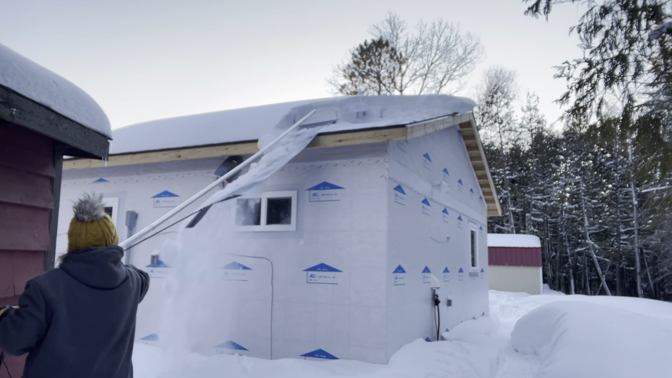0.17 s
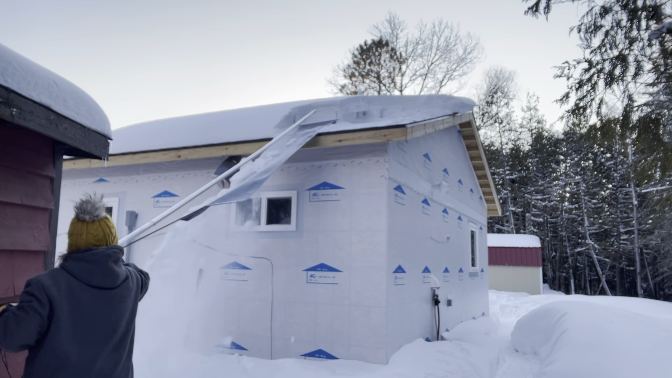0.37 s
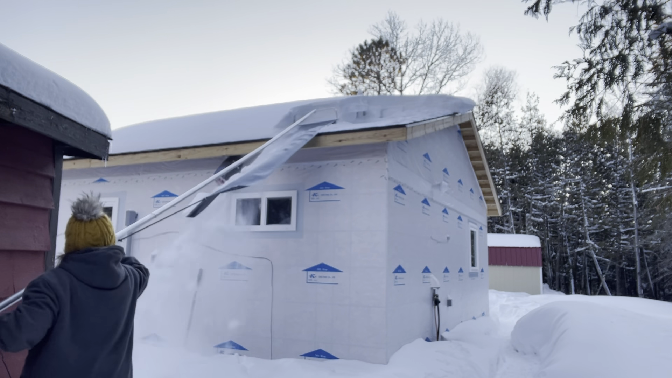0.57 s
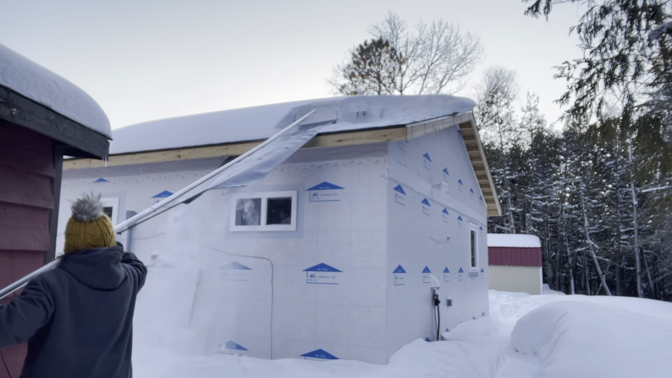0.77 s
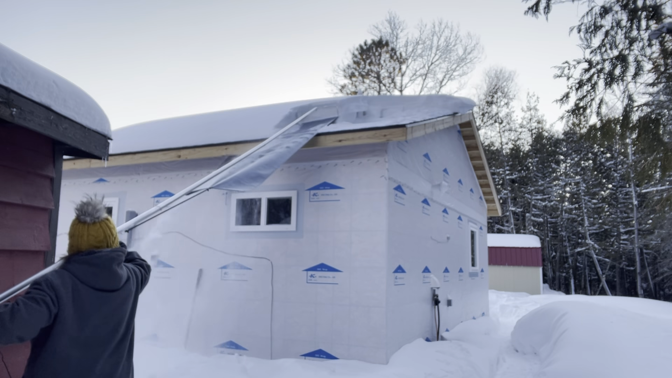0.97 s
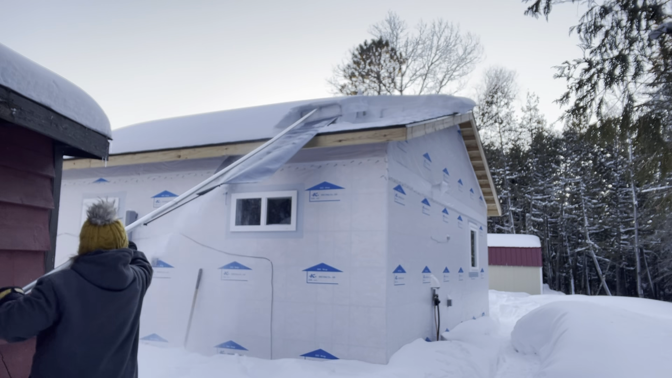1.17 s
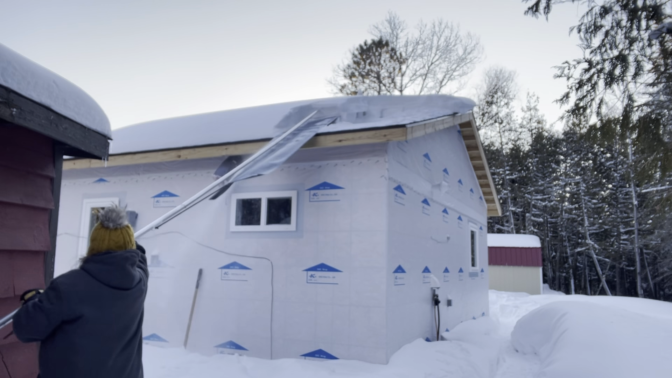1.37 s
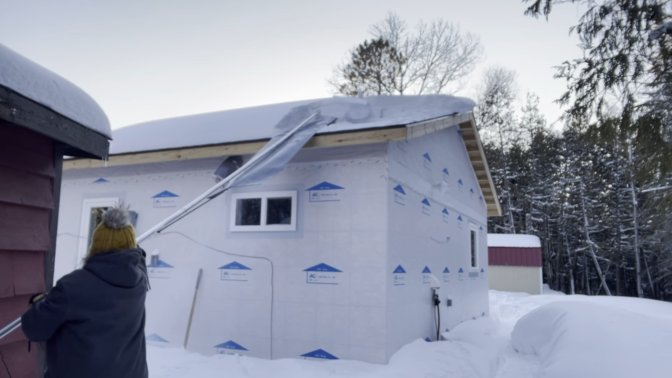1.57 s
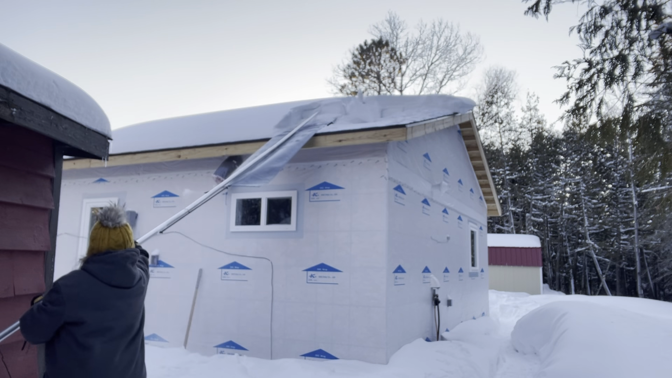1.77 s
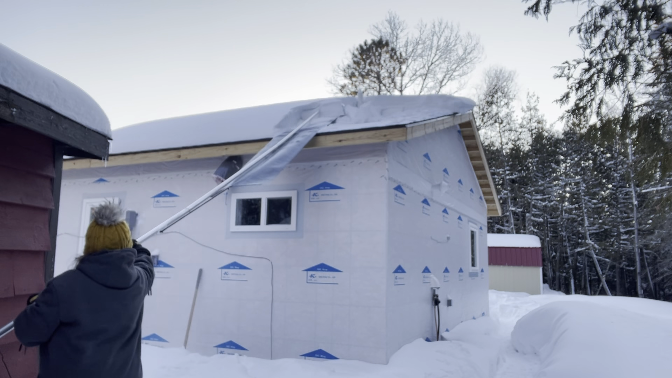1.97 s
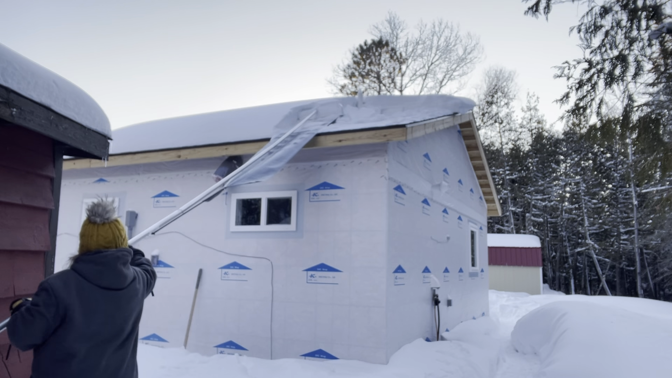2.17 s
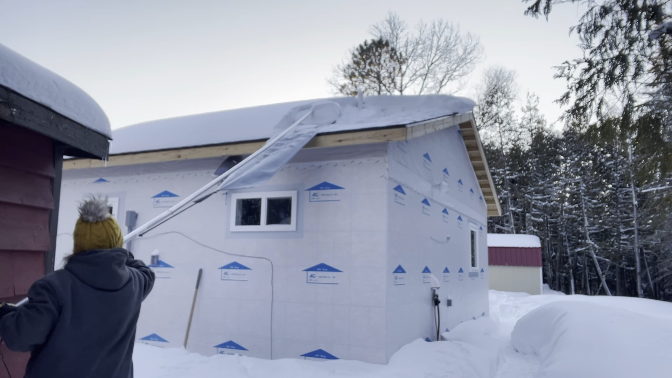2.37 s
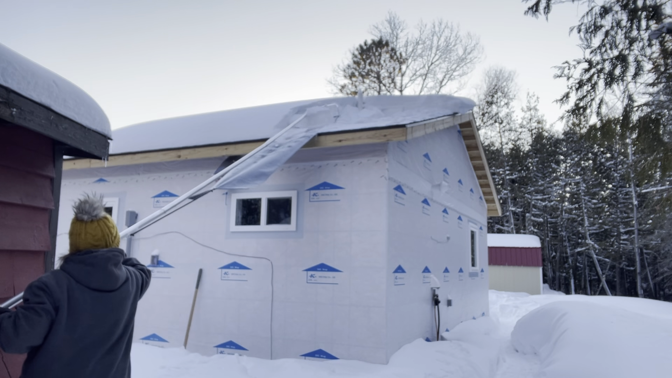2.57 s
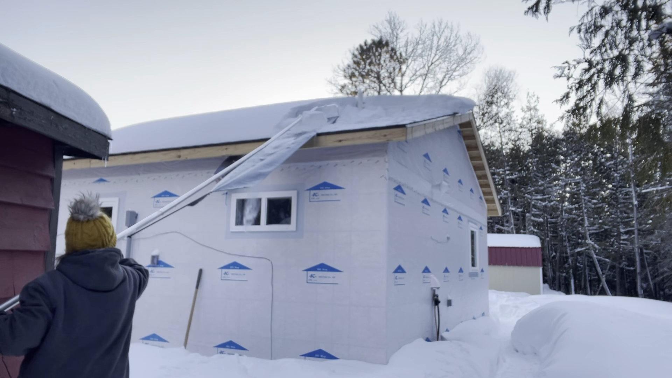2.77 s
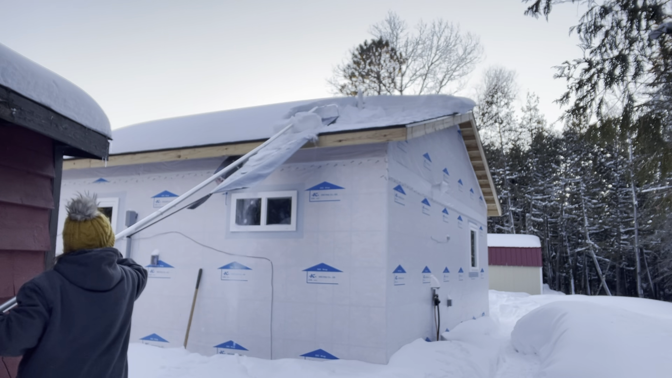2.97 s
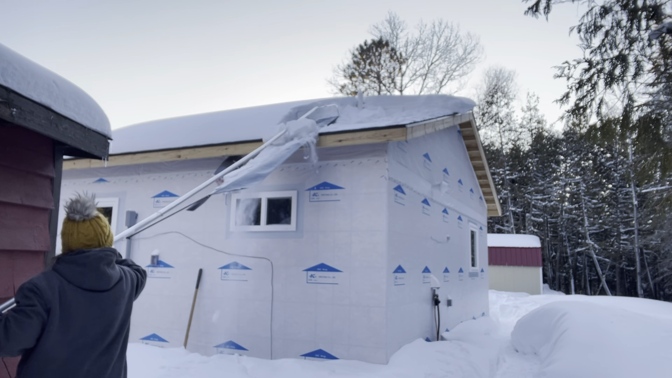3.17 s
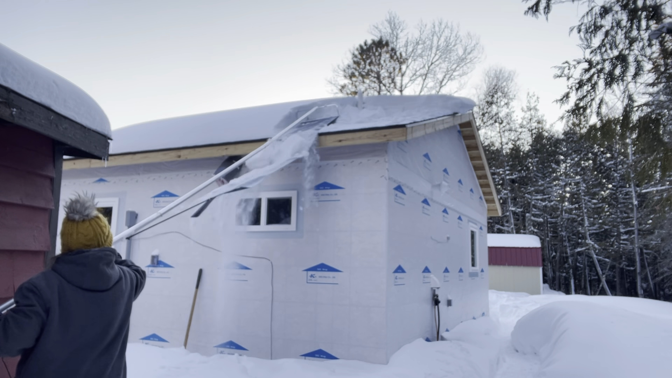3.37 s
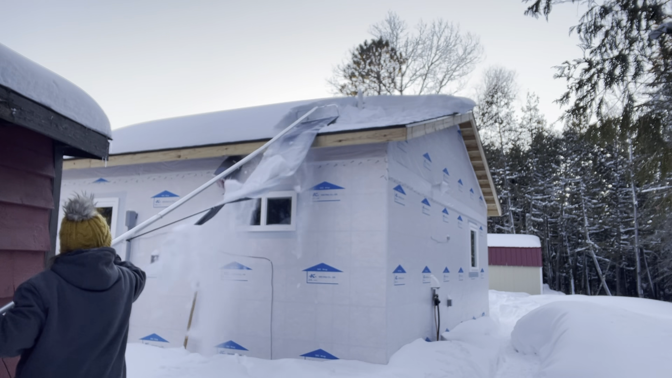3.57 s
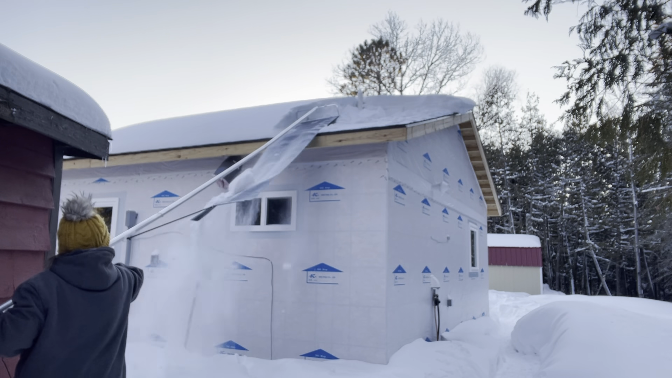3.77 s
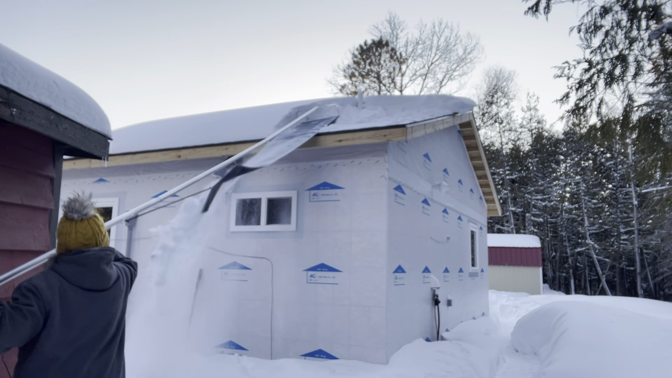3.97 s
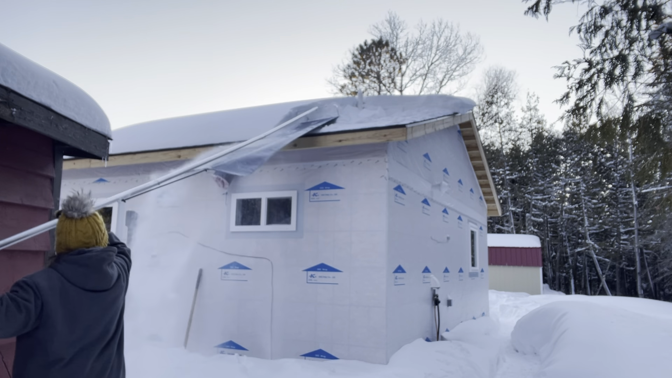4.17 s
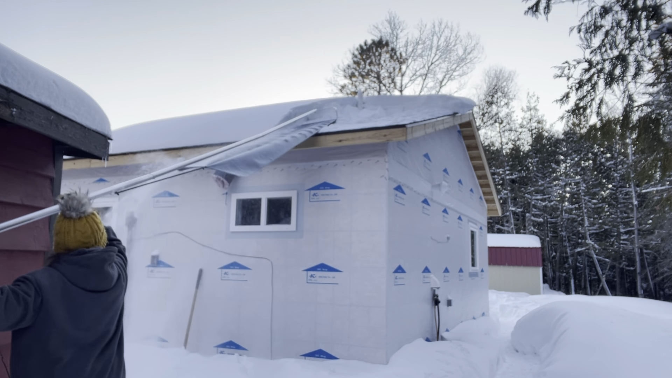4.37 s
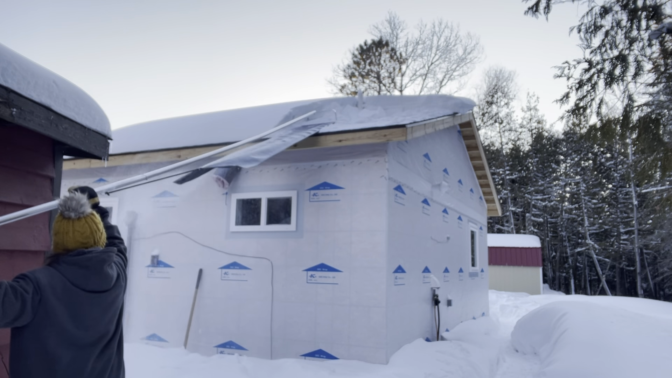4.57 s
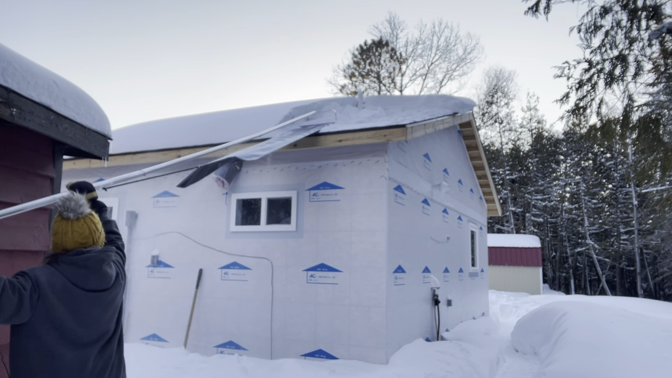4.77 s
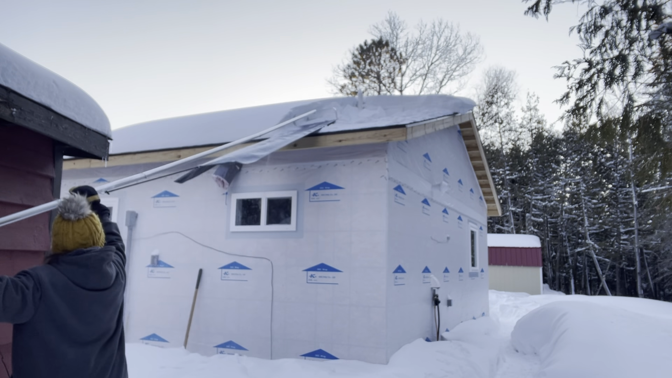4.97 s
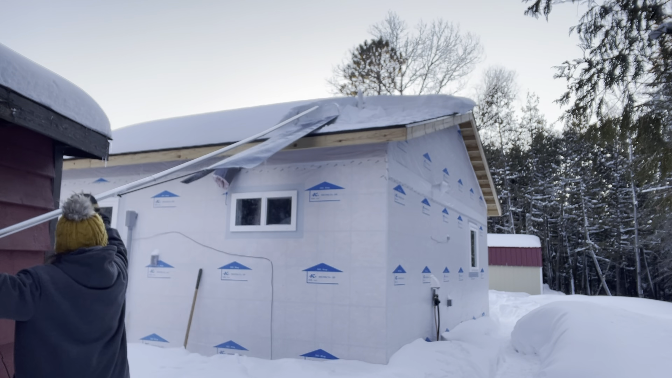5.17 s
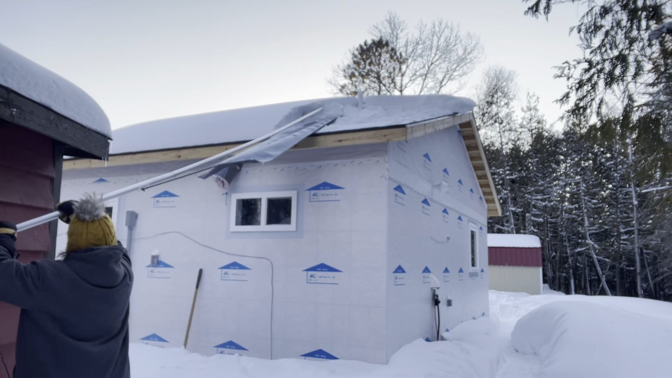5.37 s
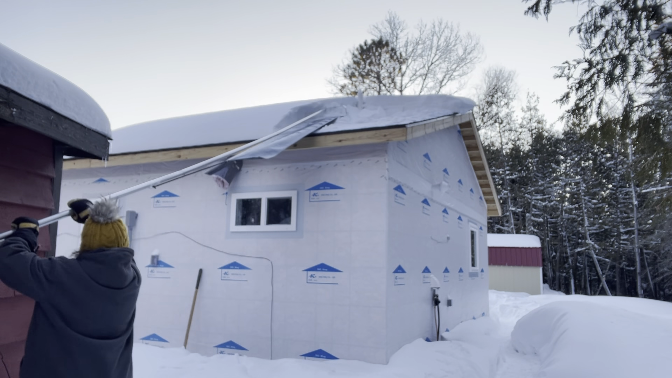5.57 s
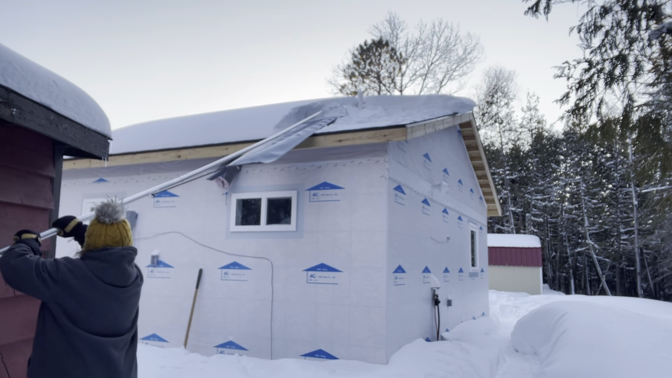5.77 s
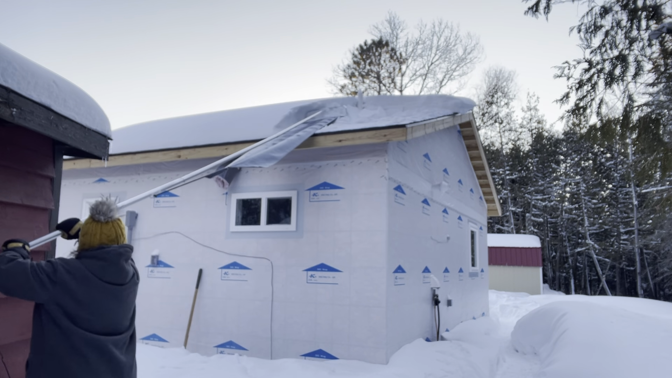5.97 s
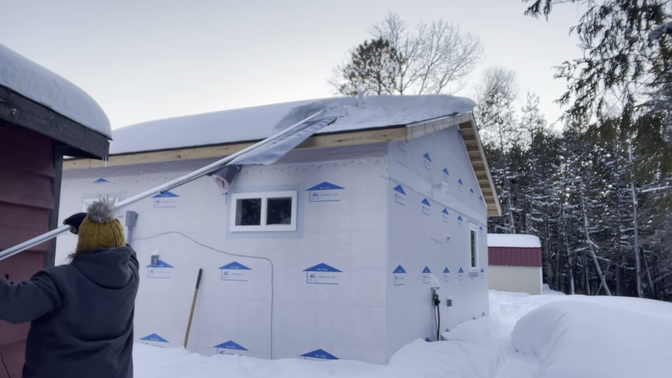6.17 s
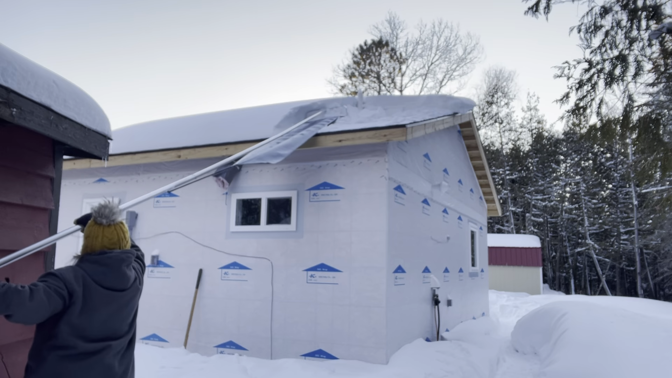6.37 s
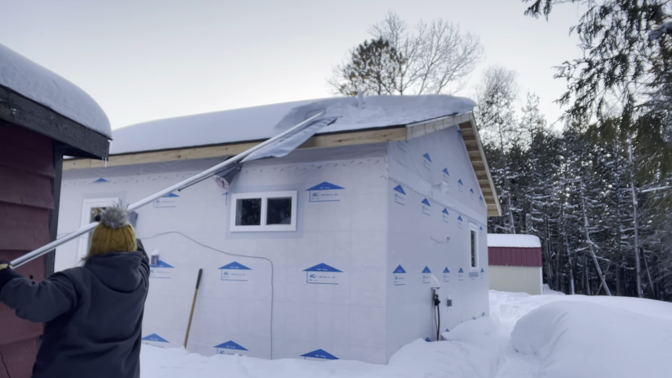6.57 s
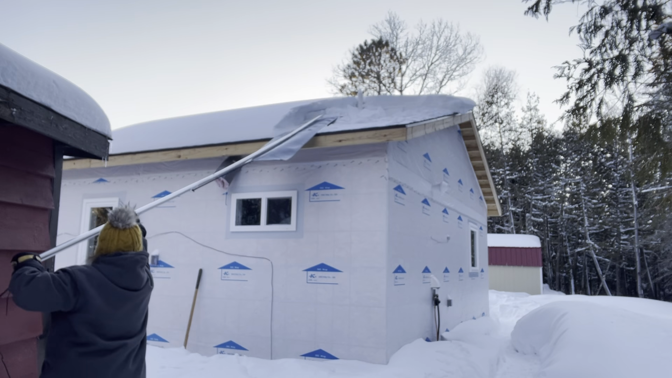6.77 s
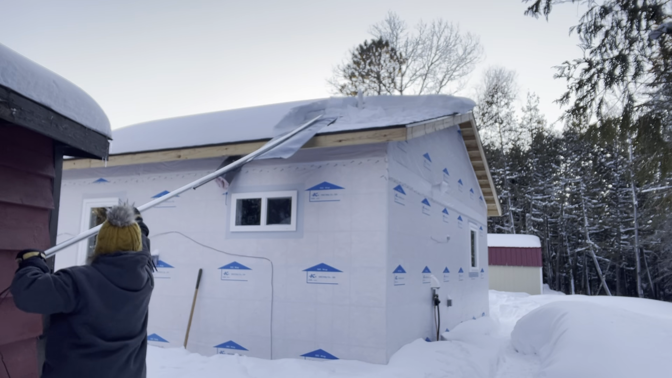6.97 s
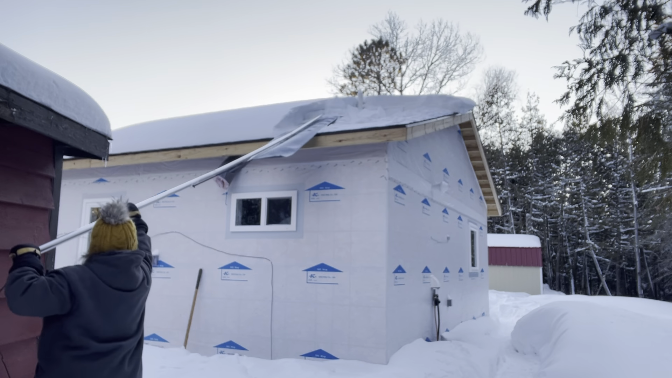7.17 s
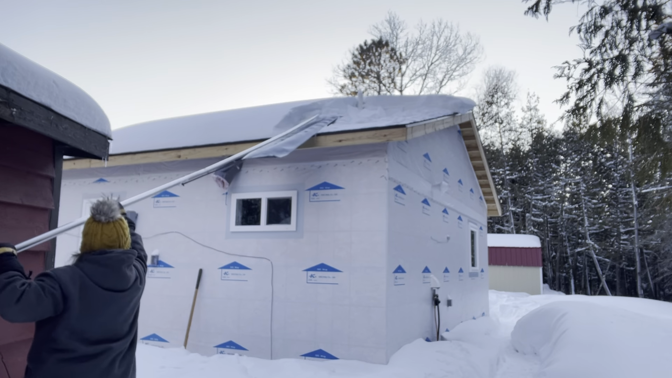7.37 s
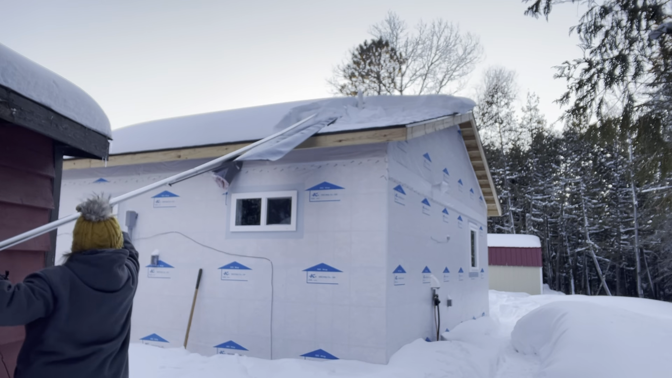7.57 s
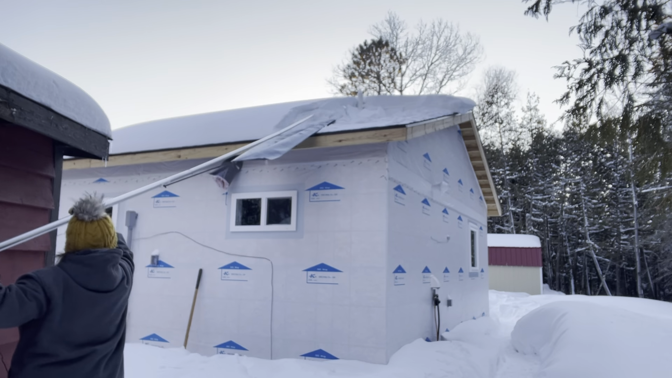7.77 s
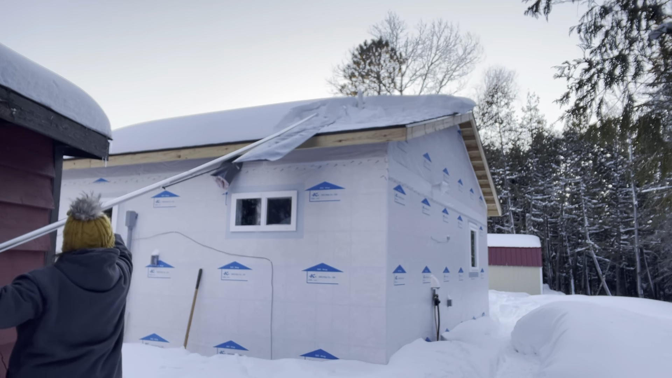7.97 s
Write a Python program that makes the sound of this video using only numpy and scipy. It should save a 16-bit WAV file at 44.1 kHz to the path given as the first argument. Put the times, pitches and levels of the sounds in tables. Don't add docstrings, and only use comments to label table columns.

```python
import sys
import numpy as np
from scipy import signal
from scipy.fft import rfft, irfft, next_fast_len
from scipy.io import wavfile
from scipy.ndimage import uniform_filter1d, map_coordinates

SR = 44100
rng = np.random.default_rng(int(sys.argv[2]) if len(sys.argv) > 2 else 0)


def unload_audio(sound):
    columns = np.transpose(np.atleast_2d(sound))
    steps = np.round(np.clip(columns, -1, 1) * 32767)
    wavfile.write(sys.argv[1], SR, steps.astype(np.int16))


def gain_from_decibels(decibels):
    exponent = np.asarray(decibels, float) / 20
    return 10 ** exponent


N = 353373

# (frequency [Hz], density [dB per Hz])
YARD_COLOUR = [(88, -33), (150, -21), (634, 6), (786, -4), (1250, -15), (3660, -11), (7830, -9),
               (10100, -6), (15800, -4)]
# (time
# [s], peak level [dB], ground pitch [Hz], pitch sag [share])
FIRST_LUMPS = [(.002, -54, 55, .5), (.160, -42.5, 54.5, 3.8), (.300, -46, 55, 0.66), (0.366, -45, 70, 2.2),
               (.430, -41, 65, 0.67), (.468, -48, 55, .7), (.530, -50, 55, .66), (.580, -52, 55, .6),
               (.630, -51, 55, .6), (.675, -54, 55, .6), (.720, -54, 55, .6), (.770, -52, 60, .8),
               (0.846, -33, 52, 2.9), (0.911, -47, 60, 1.5), (0.981, -49, 55, .8), (1.031, -45, 58, 2.8),
               (1.270, -52, 70, 1.2), (1.325, -54, 70, 1.2), (1.637, -52, 110, 0.87), (1.931, -46, 101, .8),
               (1.970, -59, 95, .7), (2.009, -34.5, 151, 0.48)]
SECOND_LUMPS = [(3.680, -59, 75, 1.2), (3.960, -56, 69.6, 0.64), (3.985, -41, 75, .65),
                (4.002, -38, 144, 1.1), (4.035, -52, 65, .8), (4.255, -65, 65, .8), (4.309, -50, 75, 2.6),
                (4.343, -37, 151, .4), (4.353, -26.5, 60.4, .15), (4.385, -43, 99, .28),
                (4.421, -41, 61, 0.87), (6.600, -59, 80, .8), (6.830, -52, 94, 0.99)]
FLOW_FADE_DB = 189


def unit(x):
    return x / np.sqrt(np.mean(x ** 2) + 1e-20)


def along(points, hz):
    f, v = np.transpose(points)
    return np.interp(np.log(hz + 1), np.log(f + 1), v)


def curves(rows):
    s, *columns = np.transpose(rows)
    return [np.interp(np.arange(N) / SR, s, column) for column in columns]


def wobble(rate):
    knots = rng.standard_normal(int(N * rate / SR) + 4)
    return map_coordinates(knots, [np.arange(N) * rate / SR])


def span(s, length, fade_db):
    t = np.arange(N) / SR - s
    return -fade_db * np.maximum(-t, t - length).clip(0)


def filtered(x, response):
    m = next_fast_len(N + 8192)
    return irfft(rfft(x, m) * response(np.fft.rfftfreq(m, 1 / SR)), m)[..., :N]


def rush(spectrum, patchy_db, grain_db, edge=((0, 1, -60), (9, 1, -60))):
    grains = rng.standard_normal((2, N)) * gain_from_decibels(grain_db * wobble(900))
    hz, t, z = signal.stft(grains, SR, nperseg=1024)
    field = uniform_filter1d(rng.standard_normal(z.shape[1:]), size=12, axis=0)
    field = uniform_filter1d(field, size=5, axis=1)
    s, edge_hz, below_db = np.transpose(edge)
    above = 1 / (1 + (np.interp(t, s, edge_hz) / (hz[:, None] + 1)) ** 24)
    above = above + (1 - above) * gain_from_decibels(np.interp(t, s, below_db))
    patches = gain_from_decibels(patchy_db * unit(field))
    pair = signal.istft(z * above * patches, nperseg=1024)[1][:, :N]
    return unit(filtered(pair, lambda hz: gain_from_decibels(along(spectrum, hz))))


def blows(table, fall, burst_s, burst_spectrum):
    wave, burst = np.zeros(N + SR), np.zeros(N + SR)
    t = np.arange(SR // 4) / SR
    for s, db, hz, cycles, burst_db, sag in table:
        start = round(s * SR)
        turns = hz * t + sag * fall * (1 - np.exp(-hz * t / fall))
        u = hz * t / max(cycles, .1)
        wave[start:][:len(t)] += gain_from_decibels(db) * u * np.exp(1 - u) * np.sin(2 * np.pi * turns)
        burst[start:][:len(t)] += gain_from_decibels(db + burst_db) * t / burst_s * np.exp(1 - t / burst_s)
    noise = unit(filtered(rng.standard_normal(N), lambda hz: gain_from_decibels(along(burst_spectrum, hz))))
    return wave[:N] + burst[:N] * noise


def from_left(x, lean_db):
    lag_s = 0.00057

    def late(hz):
        phase = np.pi * hz * lag_s / np.sqrt(1 + (hz / 560) ** 2)
        return np.exp(np.outer([0, -2j], phase))

    return gain_from_decibels([[lean_db], [-lean_db]]) * filtered(x, late)


def yard():
    return gain_from_decibels(-75.5) * rush(YARD_COLOUR, patchy_db=-3.0, grain_db=2.0)


def under():
    # (time [s], level [dB], length [s])
    cloth_moves = [
        (0, -61.5, 0.58),
        (1.23, -61, 0.42),
        (2.05, -59, 0.11),
        (2.39, -65, 0.11),
        (2.7, -77, 0.75),
        (3.923, -65.5, .04),
        (4.332, -68, 0.038),
        (5.023, -69, 0.44),
        (6.587, -57.5, 0.15),
        (7.193, -66, 0.74),
    ]
    # (frequency [Hz], density [dB per Hz])
    rumble_colour = [(15, -56), (30, -38), (42, -7), (58, -2.5), (90, -6.5), (140, -0.5), (250, -40)]
    # (frequency [Hz], density [dB per Hz])
    rustle_colour = [(100, -29), (170, -4), (300, 2.5), (450, -4), (650, -17.5)]
    rest_db, ground_rest_db = -89, -80.5
    moves = gain_from_decibels(rest_db) + sum(gain_from_decibels(db + span(s, length, fade_db=77)) for s, db, length in cloth_moves)

    powder_db, powder_s = -26.5, 0.076
    s, db = np.transpose(FIRST_LUMPS + SECOND_LUMPS)[:2]
    falls = np.bincount((s * SR).astype(int), gain_from_decibels(db + powder_db), N)
    trail = filtered(falls, lambda hz: 2 * powder_s * SR / (1 + (2 * np.pi * hz * powder_s) ** 2))

    ground = gain_from_decibels(ground_rest_db) + trail + gain_from_decibels(-18) * moves
    lumpy = gain_from_decibels(0.2 + 3 * wobble(15))
    rumble = ground * lumpy * rush(rumble_colour, patchy_db=2.7, grain_db=-0.2)
    rustle = moves * gain_from_decibels(3.5 + 1.7 * wobble(25)) * rush(rustle_colour, patchy_db=-0.5, grain_db=2.5)
    return rumble + rustle


def snaps():
    # (time [s], peak level [dB])
    snap_times = [(5.254, -45), (6.089, -50), (6.254, -51), (6.266, -50), (6.803, -35), (6.812, -29),
                  (6.819, -31), (6.842, -31), (6.849, -32), (6.856, -36), (6.943, -36), (6.953, -41),
                  (7.002, -56), (7.033, -57), (7.049, -54)]
    gate, t = np.zeros(N + SR), np.arange(SR // 50) / SR
    for s, db in snap_times:
        gate[round(s * SR):][:len(t)] += gain_from_decibels(db - 8 - 60 * t / .008)
    return gate[:N] * rush(YARD_COLOUR, patchy_db=1.0, grain_db=4)


def lumps():
    puff = [(80, -6), (200, 5), (500, 1), (1500, -8), (3500, -11), (7000, -39), (15000, -60)]
    rows = [(s, db, hz, 0.41, -19.5, sag) for s, db, hz, sag in FIRST_LUMPS]
    rows += [(s, db, hz, .62, -16.5, sag) for s, db, hz, sag in SECOND_LUMPS]
    return from_left(blows(rows, fall=0.39, burst_s=0.014, burst_spectrum=puff), lean_db=.6)


def pole():
    # (time [s], peak level [dB], tube pitch [Hz], pitch sag [share])
    hand_knocks = [(.840, -49, 380, 0.87), (1.592, -53, 270, .63), (1.624, -38, 300, 3.2),
                   (1.732, -35.5, 290, 1.8), (1.810, -49, 400, 0.92), (1.845, -39.5, 344, 0.93),
                   (1.854, -38.5, 317, 0.94), (1.912, -38, 255, 2.9), (1.959, -50, 300, 0.72),
                   (2.007, -25, 276, 0.58), (2.023, -44, 290, 0.3), (2.300, -46, 290, 0.68),
                   (4.228, -40, 262, 1.3), (5.300, -48.5, 380, .9), (5.33, -51, 480, 0.76),
                   (6.874, -54, 450, 1.6), (7.013, -49.5, 397, 2.3), (7.178, -50, 320, .65),
                   (7.587, -47, 318, .89)]
    # (time [s], peak level [dB], pitch [Hz])
    light_taps = [
        (1.245, -39.5, 740),
        (2.617, -35, 1470),
        (4.011, -34.5, 318),
        (4.378, -41, 440),
        (5.033, -49, 590),
        (5.050, -48, 520),
        (5.288, -44.5, 534),
        (5.318, -45, 560),
        (6.802, -41, 483),
    ]
    # (time [s], peak level [dB], pitch [Hz])
    thin_ticks = [
        (5.831, -52.5, 1200),
        (6.068, -60, 1500),
        (6.077, -56, 1400),
        (6.086, -52, 1450),
        (6.109, -51, 1360),
        (6.153, -51, 1400),
        (6.982, -53, 1100),
    ]
    # (time [s], level [dB], length [s])
    joint_rattles = [
        (1.592, -47.5, 0.008),
        (1.628, -46, 0.045),
        (1.779, -51.5, 0.096),
        (2.074, -44, .012),
        (4.005, -39.5, 0.016),
        (4.36, -52, .03),
        (6.068, -66, 0.024),
    ]
    # (frequency [Hz], width [Hz], level [dB])
    tube_modes = [(740, 190, -3.5), (1400, 150, 0.5), (2290, 500, -12)]
    tick = [(300, -8), (750, 0.0), (1450, -11), (2200, -20), (6000, -30), (15000, -45)]

    rows = []
    for s, db, hz, sag in hand_knocks:
        cycles = 1.16 - 0.19 * sag
        tick_db = -7 - 0.49 * (db + 45)
        rows.append((s, db, hz, cycles, tick_db, sag))
    rows += [(s, db, hz, 1.46, -11.5, 0.76) for s, db, hz in light_taps]
    rows += [(s, db, hz, 0.99, -14, 0.76) for s, db, hz in thin_ticks]
    knocks = blows(rows, fall=0.67, burst_s=0.0021, burst_spectrum=tick)

    chatter = unit(rng.standard_normal(N) * gain_from_decibels(2.1 * wobble(300)))
    chatter = chatter * sum(gain_from_decibels(db + span(s, length, fade_db=2500)) for s, db, length in joint_rattles)

    def tube(f):
        total = 0
        for k, (centre, w, db) in enumerate(tube_modes):
            total = total + (-1) ** k * gain_from_decibels(db) * 1j * f * w / (centre * centre - f * f + 1j * f * w)
        return 7 * total

    return from_left(knocks + filtered(chatter, tube), lean_db=2.0)


def flow():
    # (time [s], flow level [dB], bite of coarse snow re powder [dB])
    runs = [
        [(0.0, -37.5, -2.5), (0.322, -39.5, -1.5), (0.676, -44, -4.5), (0.936, -50.5, -3.5), (1.102, -45.5, -5),
         (1.142, -51, -2), (1.174, -45.5, -4), (1.532, -48.5, -1.5), (1.61, -55.5, -2.5)],
        [(3.05, -43.5, -0.5), (3.444, -33.5, -3.5), (3.632, -35, -2.5), (3.952, -38, -4.5), (4.118, -48.5, -7),
         (4.336, -54.5, -5), (4.378, -55.5, 1), (4.418, -55.5, -6), (4.87, -61, -7)],
    ]
    # (time [s], flow level [dB], bite of coarse snow re powder [dB])
    strokes = [
        [(1.66, -56, -1), (1.75, -54.5, -4), (1.83, -55.5, 2), (2.25, -50.5, 0), (2.39, -52.5, 2.5),
         (2.7, -49.5, 3.5), (2.95, -45.5, 1)],
        [(4.93, -59, -2.5), (4.98, -53, -3), (5.06, -51, -2), (5.15, -47.5, 0), (5.33, -44.5, -6),
         (5.6, -48, -4.5), (5.69, -57, 1), (5.79, -70, -2.5)],
        [(6.03, -70, -7), (6.09, -69, 2.5), (6.22, -69.5, -3.5)],
        [(6.32, -70.5, -1), (6.47, -47.5, -2), (6.65, -43, -3), (6.82, -44.5, -1.5), (6.87, -66, -2),
         (6.98, -70, -7)],
        [(7.04, -69, 3.5), (7.1, -55.5, -1.5), (7.21, -49, -4.5), (7.37, -46.5, -6), (7.63, -51.5, -3.5),
         (7.68, -54.5, 6), (7.75, -50, 1), (8.01, -49, 4.5)],
    ]
    # (time [s], depth [dB], length [s])
    catches = [
        (5.174, 4.5, .02),
        (5.248, 8, 0.022),
    ]
    flow_db, bite_db = curves(sorted(row for move in runs + strokes for row in move))
    for s, db, length in catches:
        flow_db = flow_db - np.maximum(db + span(s, length, fade_db=FLOW_FADE_DB), 0)
    return flow_db, bite_db


def crust():
    # (time [s], edge [Hz], level left below it [dB])
    shaves = [
        [(0, 506, -5.5), (1.1, 590, -8)],
        [(2.7, 1090, -9.5), (3.1, 1010, -9.5), (3.36, 524, -17), (3.88, 527, -20)],
        [(5.42, 1220, -7), (5.66, 1200, -6), (5.72, 500, -9), (6.06, 950, -12), (6.25, 950, -5)],
    ]
    loose = (313, -6.5)
    turn_s = 0.12
    edge = []
    for rows in shaves:
        edge += [(rows[0][0] - turn_s, *loose), *rows, (rows[-1][0] + turn_s, *loose)]
    return edge


def slide():
    # (time [s], crumbling gain [dB], length [s])
    clod_breaks = [
        (0.356, 1.5, 0.43),
        (1.15, 3.5, .05),
        (3.398, 1, 0.25),
        (4.515, 9, 0.073),
        (5.025, 4, 0.037),
        (5.698, 4, 0.068),
        (6.268, 9.5, 0.053),
        (7.655, 3.5, 0.035),
    ]
    # (time [s], level [dB], length [s])
    brushes = [
        (6.941, -55, .018),
        (5.120, -47, 0.027),
    ]
    # (frequency [Hz], density [dB per Hz])
    fine_colour = [(2940, -33.5), (5000, -9.5), (6370, -12.5), (7510, -11.5), (10700, 1), (14200, 1),
                   (15100, 2.5), (15900, -6)]
    # (frequency [Hz], density [dB per Hz])
    coarse_colour = [(900, -24.5), (1400, -1.5), (2000, -1.5), (2800, -2.5), (3400, -1), (5000, -4),
                     (6500, -7.5), (8000, -20.5)]
    # (frequency [Hz], density [dB per Hz])
    crumble_colour = [(200, -26), (330, -6.5), (520, -3.5), (800, -2), (1100, -1), (1400, -4),
                      (2000, -18.5)]

    hiss_db, scrape_db = flow()
    crumble_db = -5.5 + 1.16 * scrape_db + 0.12 * (hiss_db + 48)
    for s, db, length in clod_breaks:
        crumble_db = crumble_db + np.maximum(db + span(s, length, fade_db=FLOW_FADE_DB), 0)
    flow_db = hiss_db + 0.39 * wobble(7)
    for s, db, length in brushes:
        flow_db = np.maximum(flow_db, db + span(s, length, fade_db=2500))

    fine = gain_from_decibels(flow_db + 0.9) * rush(fine_colour, patchy_db=0.85, grain_db=0.5)
    coarse_db = flow_db + scrape_db + 1.0 + 0.36 * wobble(12)
    coarse = gain_from_decibels(coarse_db) * rush(coarse_colour, patchy_db=1.12, grain_db=1.0)
    clods_db = flow_db + crumble_db + 2.0 + 0.65 * wobble(15)
    clods = gain_from_decibels(clods_db) * rush(crumble_colour, patchy_db=1.5, grain_db=1, edge=crust())
    return fine + coarse + clods


def width():
    # (start [s], end [s], first level [dB], last level [dB])
    spreads = [
        (0, .62, -2.5, 0.5),
        (1.64, 1.86, 4, 0),
        (3.4, 4.85, -2, 9),
        (5.78, 6.33, 11, 4),
        (6.88, 7.02, 5, 2),
    ]
    narrow_db, turn_s = -4, 0.11
    rows = []
    for a, b, first_db, last_db in spreads:
        rows += [(a - turn_s, narrow_db), (a, first_db), (b, last_db), (b + turn_s, narrow_db)]
    return gain_from_decibels(curves(rows)[0])


def ports(pair):
    # (frequency [Hz], difference re sum [dB])
    difference = [(60, -8.5), (500, -7), (1250, -8), (1750, -10.5), (2300, -6.5), (3200, -7.5),
                  (4500, -7.5), (6000, -2), (7500, 8.5), (9500, 1), (11000, -10), (11900, -27),
                  (12700, -28), (13200, -7.5), (14500, -2.5), (15600, 0)]
    # (frequency [Hz], signed part of the difference that is only a phase shift [share])
    shifted = [(60, 0.57), (400, 0.39), (1000, -0.59), (4500, -0.072), (6000, -.5), (8000, -.8),
               (10800, -.87), (12000, -.1), (13300, .85), (15600, .93)]
    middle_range = [(500, 0.39), (1300, 1.0), (4600, 0.26), (5600, 0.069)]

    def apart(hz):
        share = np.clip(along(shifted, hz), -.99, .99)
        return gain_from_decibels(along(difference, hz)) * [1j * share, np.sqrt(1 - share ** 2)]

    side = filtered(pair, apart).sum(axis=0)
    middle = filtered(side, lambda hz: np.clip(along(middle_range, hz), 0, 1))
    lean = filtered(pair[0], lambda hz: 0.1 / (1 + (hz / 800) ** 2))
    return pair[0] + np.outer([1, -1], lean + side + (width() - 1) * middle)


def scene():
    spread = yard() + under() + snaps() + slide()
    return ports(spread) + lumps() + pole()


def low_pass(x):
    return signal.sosfilt(signal.butter(12, 16490, fs=SR, output="sos"), x)


def record(dry):
    mix = filtered(dry, lambda hz: hz < 15790)
    return low_pass(mix)


dry = scene()
out = record(dry)
unload_audio(out)
```